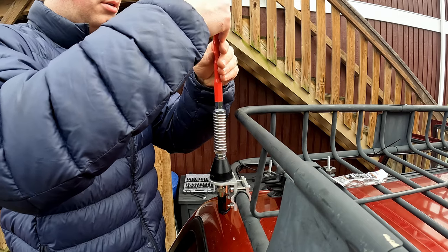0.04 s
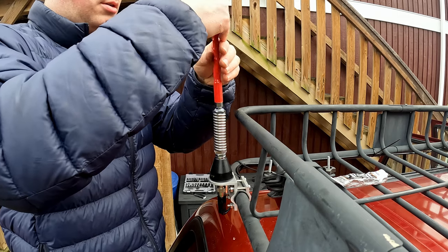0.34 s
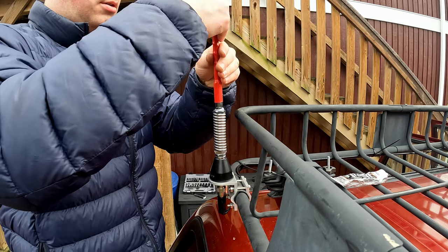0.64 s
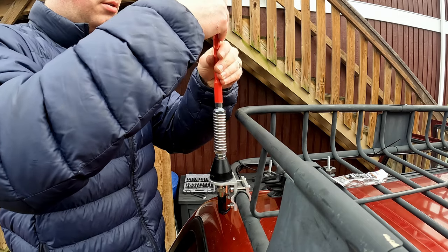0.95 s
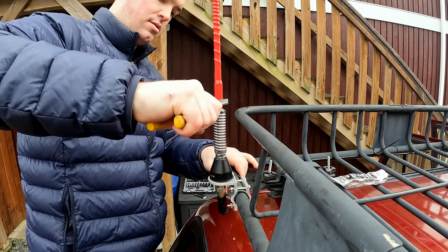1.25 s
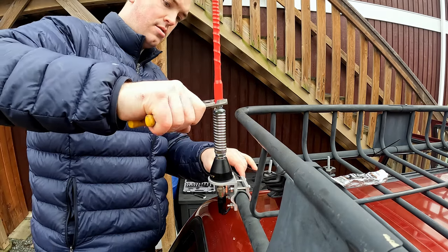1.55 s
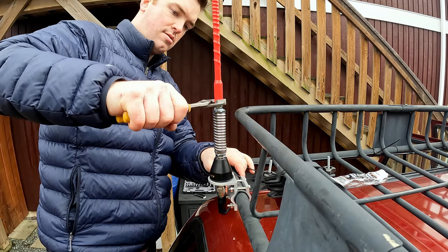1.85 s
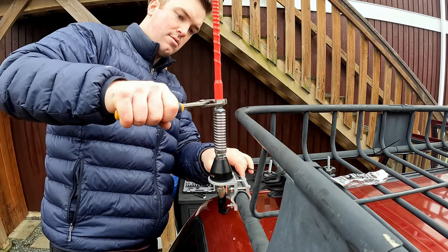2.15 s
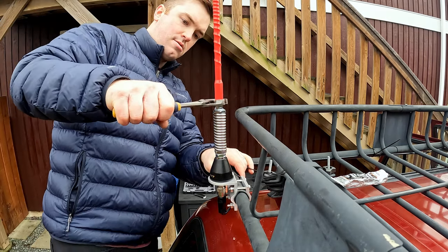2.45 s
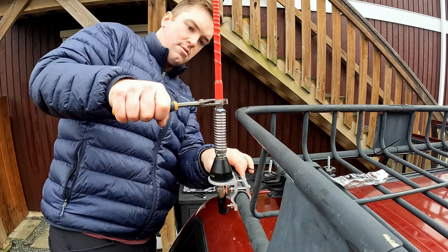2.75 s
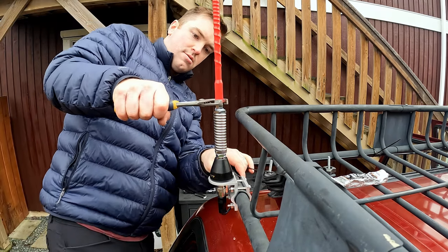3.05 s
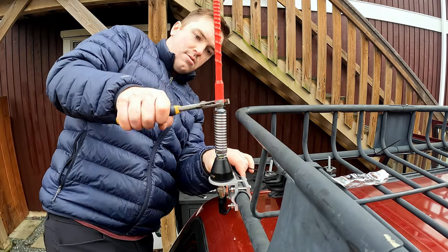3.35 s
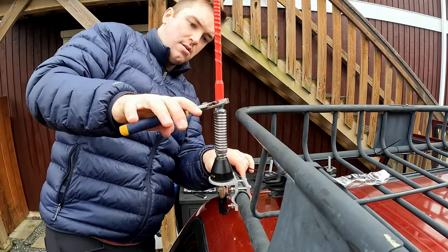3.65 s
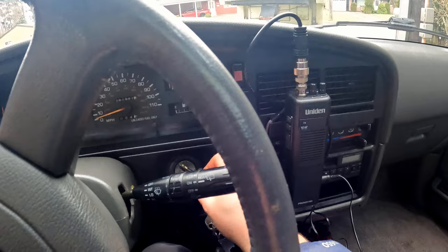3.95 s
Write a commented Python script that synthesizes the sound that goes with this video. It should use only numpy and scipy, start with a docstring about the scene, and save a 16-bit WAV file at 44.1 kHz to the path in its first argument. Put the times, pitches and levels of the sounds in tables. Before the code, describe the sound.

Close pliers give a few sharp steel clicks, pause, then snap off a nut with a loud, ringing sheet-metal knock and a short scrape. Outdoor rumble and far traffic run underneath, with very faint jacket rustle and birds.

```python
"""A yard, microphone close to a car bonnet, with distant traffic and a low rumble behind.
A padded jacket swishes and hands thud softly while pliers tighten a spring antenna base, the steel jaws
clicking on the nut. Faint birds call as the arms move slowly. Near 3.5 s the jaws slip with a loud knock:
the bonnet booms, the spring chatters and the recorder's gain ducks. Last, the jaws scrape off the nut
and a puff of wind catches the microphone."""
import sys
import numpy as np
from scipy import signal
from scipy.fft import rfft, irfft, next_fast_len
from scipy.io import wavfile
from scipy.ndimage import uniform_filter1d, map_coordinates

SR = 44100
rng = np.random.default_rng(int(sys.argv[2]) if len(sys.argv) > 2 else 0)


def transcribe(u):
    """Save the signal u as a 16-bit wav file named by the first command-line argument.

    u: samples, shape (n,) or (channels, n), limited to [-1, 1]; the rate is SR.
    q: integer samples, one column per channel.
    """
    v = np.clip(np.atleast_2d(u).T, -1, 1)
    q = np.round(v * 32767).astype(np.int16)
    wavfile.write(sys.argv[1], SR, q)


N = 176400
SNAP_S = 3.4609  # the jaws jump off the nut


def clicks():
    """Steel on steel, close up: each click cracks, grinds briefly and rings; the slip is a hard snap."""
    # Jaw contacts. Each row: start in seconds, level in dB, centre of the bright band in Hz.
    contacts = [(0.632, -49, 5500), (0.8198, -34.5, 6400), (0.8441, -21, 6860), (0.86, -36, 8000),
                (0.8786, -41.5, 7900), (0.9822, -44, 6000), (1.408, -42.5, 11800), (1.429, -34.5, 12400),
                (1.9088, -50, 9200), (3.4422, -21, 12400), (3.4577, -19, 4460), (3.9405, -24, 8160)]
    # Spectra of the crack and the snap. Each row: frequency in Hz, level in dB.
    crack_colour = [(1000, 8), (2500, 3), (3800, -3), (5500, -2.5), (11500, -6), (15500, -15)]
    snap_colour = [(1000, 1.5), (3500, -5.5), (5600, -0.5), (7400, -3.5), (8100, -49), (10600, -10.5),
                   (15000, -46)]
    crack_db, crack_t60_s, grind_db, grind_t60_s = -5, 0.0096, -27, 0.11
    ring_db, snap_db, snap_t60_s = 9.5, -1.2, 0.0085
    out, t = np.zeros((2, N)), clock()[:SR // 6]
    rise = 1 - np.exp(-t / 0.00035)
    decay = amp(crack_db - 60 * t / crack_t60_s) + amp(grind_db - 60 * t / grind_t60_s)
    for start, db, centre_hz in contacts:
        bright = lambda hz: band(hz, centre_hz, octaves=1.03)
        crack = noise(lambda hz: amp(along(crack_colour, hz)) * bright(hz), side_db=-6.5, size=len(t))
        ring = filtered(steel(), bright)
        add(out, start, amp(db) * (crack * rise * decay + amp(ring_db) * ring))
    snap = coloured(snap_colour, side_db=-10, size=len(t))
    add(out, SNAP_S, amp(snap_db - 60 * t / snap_t60_s) * rise * snap)
    return pan(out, left_db=1.0)


def steel():
    """The pliers' thin ring after one contact, of energy 1."""
    # Modes of the pliers. Each row: frequency in Hz, relative level in dB, t60 in seconds.
    modes = [(3030, -9.5, 0.032), (5300, 3, 0.0061), (7230, 1.5, 0.013), (7550, -3, 0.0093),
             (10550, 1, 0.0091)]
    t = clock()[:SR // 6]
    ring = sum(amp(db - 60 * t / t60) * np.sin(2 * np.pi * hz * t) for hz, db, t60 in modes)
    return ring / np.linalg.norm(ring)


def knocks():
    """Each blow of the mount thuds, shakes the sheet metal and feeds energy to the bonnet's modes."""
    # Knocks and rebounds. Each row: start in seconds, thud in dB, ring drive in dB, ring cutoff in Hz.
    blows = [(3.435, -23.5, -14, 980), (3.4455, -13, -14, 895), (3.462, -2.5, -1.5, 5460),
             (3.4762, -1, -8, 2500), (3.504, -9.5, -14.5, 1200), (3.525, -6.5, -12, 910),
             (3.921, -27.5, -22.5, 800)]
    # Spectrum of the dense sheet-metal ring. Each row: frequency in Hz, level in dB.
    panel_colour = [(40, -15), (120, 6), (250, -0.5), (450, -6.5), (850, -12), (1250, -5.5), (1700, -9.5),
                    (3500, -25), (7000, -34.5), (15000, -67)]
    # Its decay. Each row: frequency in Hz, t60 in seconds.
    panel_t60 = [(100, 0.6), (400, 0.26), (1200, 0.11), (3000, 0.24), (8000, 0.32)]
    # Modes of bonnet and mount. Each row: frequency in Hz, relative level in dB, t60 in seconds.
    modes = [(80.5, 2.5, 0.36), (134.6, -9.5, 0.58), (213.4, -8.5, 0.42), (296, -19, 0.51),
             (312.3, -12, 0.43), (353, -27.5, 0.92), (379, -12.5, 0.2), (456.6, -14, 0.17),
             (594, -25.5, 0.33), (710, -29, 0.41), (781, -20.5, 0.48), (879, -23, 0.27), (1087, -26, 0.26),
             (1155, -6.5, 0.055), (1393, -12.5, 0.091), (1448, -23.5, .27), (1490, -15, 0.087),
             (1955, -31, 0.31), (2086, -31, 0.21), (2140, -37, 0.12), (2276, -24.5, 0.18),
             (2970, -39, 0.36)]
    thud_hz, thud_s, panel_db, build_cycles = 237, 0.0033, -11.5, 6.6
    out, t = np.zeros((2, N)), clock()[:SR * 3 // 4]
    pulse = t / thud_s * np.exp(1 - t / thud_s) * np.exp(-(t / (4 * thud_s)) ** 2)
    thud = -pulse * np.sin(2 * np.pi * thud_hz * t)
    for start, thud_db, ring_db, cutoff_hz in blows:
        sheet = dying(coloured(panel_colour, side_db=-12, size=len(t)), panel_t60)
        sheet *= 1 - np.exp(-t / 0.0003)
        sheet = signal.sosfilt(signal.butter(2, cutoff_hz, fs=SR, output="sos"), sheet)
        add(out, start, amp(thud_db) * thud + amp(ring_db + panel_db) * sheet)
    starts, _, drives_db, cutoffs_hz = np.transpose(blows)[..., None]
    age = np.maximum(t + starts[0] - starts, 0)
    for hz, db, t60 in modes:
        build = 1 - np.exp(-age * hz / build_cycles)
        fed = amp(db + drives_db - 60 * age / t60) * build / (1 + (hz / cutoffs_hz) ** 2)
        tone = np.sin(2 * np.pi * hz * t + 0.45 * rng.standard_normal((2, 1)))
        add(out, blows[0][0], np.linalg.norm(fed, axis=0) * tone)  # the blows add in energy
    return pan(out, left_db=-3.5)


def scrapes():
    """The teeth stick and slip on the nut at an uneven rate and ring the jaws."""
    # Scrapes of the jaws. Each row: start in seconds, hold in seconds, level in dB.
    strokes = [(3.8483, 0.024, -37), (3.878, 0.049, -47.5), (3.92, 0.0096, -44), (3.935, 0.0018, -35),
               (3.9388, 0.0032, -29.5), (3.954, 0.025, -49), (3.992, 0.0032, -40)]
    # Spectrum of the grit. Each row: frequency in Hz, level in dB.
    colour = [(1200, 4.5), (2000, -0.5), (4500, 1), (9300, -6), (11500, 0.5), (15000, -28)]
    release_t60_s, slip_t60_s, jitter_hz, ring_db = 0.045, 0.015, 1300, -8
    t, force = clock(), np.zeros(N)
    for start, hold, db in strokes:
        rise = np.clip((t - start) / 0.0022, 0, 1)
        force += rise * amp(db - 60 * np.maximum(t - start - hold, 0) / release_t60_s)
    travel = np.cumsum(np.exp(wobble(jitter_hz))) * jitter_hz / 2 / SR
    slips = np.diff(np.floor(travel), prepend=0)
    bite = signal.lfilter([1], [1, -amp(-60 / (slip_t60_s * SR))], slips)
    grit = force * unit(bite) * coloured(colour, side_db=-10)
    ring = signal.fftconvolve(grit, steel()[None], axes=1)[:, :N]
    return pan(grit + amp(ring_db) * ring, left_db=2)


def spring():
    """The antenna spring chatters thinly after the knock."""
    # Fade of the chatter. Each row: time in seconds, level in dB.
    fade = [(3.47, -58.5), (3.56, -55), (3.68, -61.5), (3.84, -72)]
    chatter = (clock() > SNAP_S) * level(fade) * flutter(depth_db=4.6, rate=500)
    return chatter * noise(lambda hz: band(hz, centre_hz=5920, octaves=0.7), side_db=-9.5)


def jacket():
    """Nylon slides on nylon: quick even swishes while the hand twists the antenna, then slow arm moves."""
    # Arm moves. Each row: centre in seconds, half width in seconds, level in dB.
    moves = [(2.36, 0.33, -71.5), (2.86, 0.13, -67.5), (3.24, 0.18, -66.5)]
    # Spectrum of rubbing nylon. Each row: frequency in Hz, level in dB.
    nylon = [(1000, -8), (3000, 8), (7500, 4.5), (8300, -2.5), (11000, -3), (13000, -15), (15000, -29)]
    first_s, period_s = 0.079, 0.1518
    twists = sum(swell(first_s + k * period_s, width_s=0.04, db=-66) for k in range(8))
    rub = twists + sum(swell(*row) for row in moves)
    return pan(rub * flutter(depth_db=1.6, rate=210) * coloured(nylon, side_db=-8), left_db=2.0)


def handling():
    """The hands work the mount: dull thudding and a few distinct bumps."""
    # Thudding through the mount. Each row: time in seconds, level in dB.
    thudding = [(0, -37), (.5, -37), (.9, -38.5), (1.05, -44), (1.35, -44), (1.6, -47.5), (2, -62.5),
                (3.7, -47), (3.85, -46), (4, -46.5)]
    # Hand bumps. Each row: start in seconds, level in dB.
    bumps = [(.04, -41.5), (.2, -44.5), (.355, -50), (.632, -42), (0.746, -43), (0.979, -42.5),
             (1.008, -43.5), (1.329, -40.5), (3.894, -28), (3.913, -28.5), (3.975, -32.5)]
    # Spectra of the thudding and the bumps. Each row: frequency in Hz, level in dB.
    thud_colour = [(25, -1), (50, -12.5), (76, 10.5), (105, 2.5), (148, 6.5), (190, -10), (320, -18.5),
                   (520, -30.5), (1500, -70)]
    bump_colour = [(40, 0), (200, 6), (480, -2.5), (750, -16), (1400, -16.5), (12000, -52)]
    t, bump_t60_s = clock()[:SR // 4], 0.14
    out = level(thudding) * flutter(depth_db=3.9, rate=24.87) * coloured(thud_colour, side_db=-19)
    for start, db in bumps:
        envelope = amp(db - 60 * t / bump_t60_s) * (1 - np.exp(-t / 0.0037))
        add(out, start, envelope * coloured(bump_colour, side_db=-36, size=len(t)))
    return pan(out, left_db=-5.0)


def yard(x):
    """Fence and house walls answer briefly."""
    # Decay of the echo. Each row: frequency in Hz, t60 in seconds.
    echo_t60 = [(200, 0.35), (2000, 0.37), (12000, 0.094)]
    tail = dying(rng.standard_normal((2, SR // 2)), echo_t60)
    echo = np.pad(tail, ((0, 0), (300, 0))) / np.linalg.norm(tail[0])
    return signal.fftconvolve(x, echo, axes=1)[:, :N]


def outdoors():
    """Distant traffic with soft swells, a throbbing low rumble and one puff of wind on the microphone."""
    # Spectra of the traffic and the wind. Each row: frequency in Hz, level in dB.
    road_colour = [(20, 5), (40, -6), (90, 6), (130, -4.5), (190, -7.5), (300, -14), (450, -23), (750, -24),
                   (1150, -19.5), (1700, -24), (2800, -34), (5000, -44), (7500, -43.5), (8500, -52.5),
                   (12500, -54.5), (15000, -72)]
    gust_colour = [(15, -20), (36, -4.5), (60, -26), (200, -26), (1000, -78)]
    # Distant midrange swells. Each row: centre in seconds, level in dB.
    far_swells = [(.08, -64), (.24, -61.5), (2.69, -57), (3.02, -59)]
    # Course of the rumble. Each row: time in seconds, level in dB.
    rumble_levels = [(0, -41.5), (1.4, -49), (1.55, -40), (3.13, -45), (3.2, -54), (3.4, -40.5)]
    road_db, rumble_hz, half_width_hz = -45, 57.2, 8.9
    road = amp(road_db + 0.16 * wobble(4.52)) * coloured(road_colour, side_db=-7.5)
    far = sum(swell(centre, width_s=0.03, db=db) for centre, db in far_swells)
    far = far * noise(lambda hz: band(hz, centre_hz=1280, octaves=0.24), side_db=-6)
    rumble = noise(lambda hz: 1 / (1 + ((hz - rumble_hz) / half_width_hz) ** 4), side_db=-48)
    gust = swell(centre_s=3.89, width_s=0.05, db=-29.5) * coloured(gust_colour, side_db=-32)
    return pan(road + far, left_db=1.0) + level(rumble_levels) * rumble + gust


def birds():
    """Small birds far off: each note glides to its end pitch, some warble; most is diffuse echo."""
    # Calls. Each row: start in seconds, start and end pitch in Hz, roughness from 0 to 1, level in dB.
    chirps = [(2.298, 3300, 3700, 0.4, -67), (2.506, 3650, 4140, 0, -65), (2.668, 4800, 4400, 1, -63),
              (2.728, 3050, 3600, .9, -64), (2.975, 4300, 4400, 0.5, -70), (3.225, 4950, 4910, 0, -67)]
    note_s, glide_s, warble_hz, echo_t60_s, direct_db = 0.065, 0.014, 260, 0.35, -3
    out, t = np.zeros((2, N)), clock()[:SR // 2]
    for start, start_hz, end_hz, rough, db in chirps:
        pitch = end_hz + (start_hz - end_hz) * np.exp(-t / glide_s)
        pitch += rough * warble_hz * wobble(warble_hz)[:len(t)]
        note = np.sin(np.pi * np.minimum(t / note_s, 1)) * np.sin(2 * np.pi * np.cumsum(pitch) / SR)
        tail = rng.standard_normal((2, len(t))) * amp(-60 * t / echo_t60_s)
        echo = signal.fftconvolve(note[None], tail / np.linalg.norm(tail[0]), axes=1)[:, :len(t)]
        add(out, start, amp(db) * (amp(direct_db) * note + echo))
    return out


def amp(db):
    """Decibels to gain."""
    return 10 ** (np.asarray(db) / 20)


def unit(x):
    """Scale to rms 1."""
    return x / np.sqrt(np.mean(x ** 2) + 1e-20)


def along(points, hz):
    """Interpolate (Hz, value) points on a log axis."""
    freqs, values = np.transpose(points)
    return np.interp(np.log(hz + 1), np.log(freqs + 1), values)


def band(hz, centre_hz, octaves):
    """A bell-shaped band on a log frequency axis."""
    return np.exp(-.5 * (np.log2((hz + 1) / centre_hz) / octaves) ** 2)


def clock():
    """Time of each sample."""
    return np.arange(N) / SR


def level(rows):
    """Gain per sample from (s, dB) points."""
    return amp(np.interp(clock(), *np.transpose(rows)))


def swell(centre_s, width_s, db):
    """A bell-shaped rise and fall."""
    return amp(db) * np.exp(-.5 * ((clock() - centre_s) / width_s) ** 2)


def wobble(rate):
    """A smooth random curve, rate knots a second."""
    return map_coordinates(rng.standard_normal(4096), [clock() * rate], mode="wrap")


def flutter(depth_db, rate):
    """A wobbling gain of rms 1."""
    return unit(amp(depth_db * wobble(rate)))


def filtered(x, response):
    """Pass x through a frequency response."""
    n = x.shape[-1]
    padded = next_fast_len(n + 8192)
    return irfft(rfft(x, padded) * response(np.fft.rfftfreq(padded, 1 / SR)), padded)[..., :n]


def noise(response, side_db, size=N):
    """Stereo noise of rms 1, mostly alike in both channels."""
    mid, side = filtered(rng.standard_normal((2, size)), response)
    return unit(mid + np.array([[1], [-1]]) * amp(side_db) * side)


def coloured(points, side_db, size=N):
    """Stereo noise with a (Hz, dB) spectrum."""
    return noise(lambda hz: amp(along(points, hz)), side_db, size)


def dying(x, t60s):
    """Let each frequency of x die at its own speed."""
    hz, t, spectrum = signal.stft(x, SR, nperseg=512)
    decay = amp(-60 * t / along(t60s, hz)[:, None])
    return signal.istft(spectrum * decay, SR, nperseg=512)[1][:, :x.shape[-1]]


def pan(x, left_db):
    """Lean a sound to the left or right."""
    return x * amp(np.array([[left_db], [-left_db]]) / 2)


def add(out, start_s, x):
    """Mix x in at start_s."""
    part = out[:, max(0, round(start_s * SR)):][:, :x.shape[-1]]
    part += x[..., :part.shape[1]]


def scene():
    """The close tool work and its yard echo, over the background."""
    work = clicks() + knocks() + scrapes() + spring()
    return work + amp(-22.5) * yard(work) + jacket() + handling() + outdoors() + birds()


def record(dry):
    """The recorder's gain ducks at once and recovers slowly; the left channel lags; steep band limit."""
    duck_above_db, recover_db_per_s, top_hz, lag_samples = -12, 10, 15800, 0.29
    power = np.abs(uniform_filter1d(np.mean(dry ** 2, axis=0), size=441))
    over_db = np.maximum(10 * np.log10(power + 1e-12) - duck_above_db, 0)
    recovery_db = recover_db_per_s * clock()
    ducked = dry * amp(recovery_db - np.maximum.accumulate(over_db + recovery_db))
    delay_s = np.array([[1], [-1]]) * lag_samples / 2 / SR
    return filtered(ducked, lambda hz: (hz < top_hz) * np.exp(-2j * np.pi * hz * delay_s))


dry = scene()
out = record(dry)
transcribe(out)
```